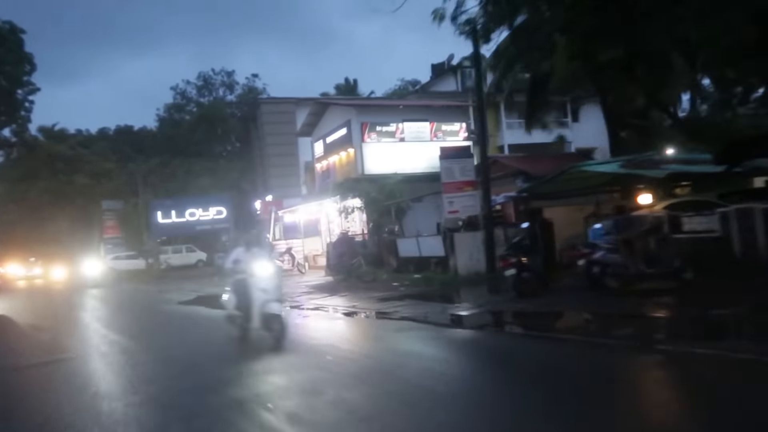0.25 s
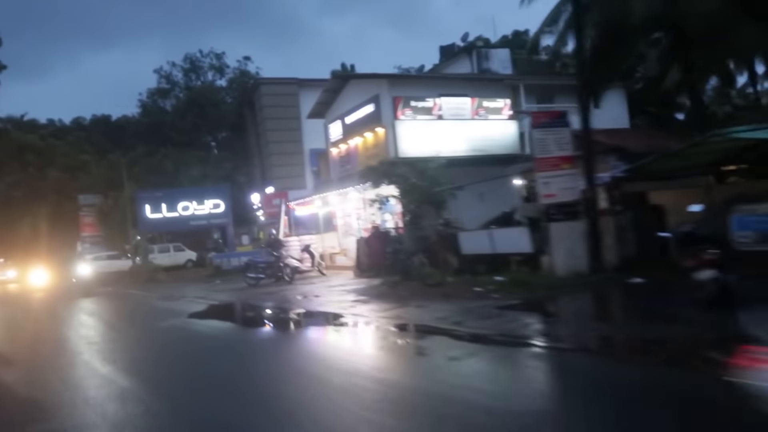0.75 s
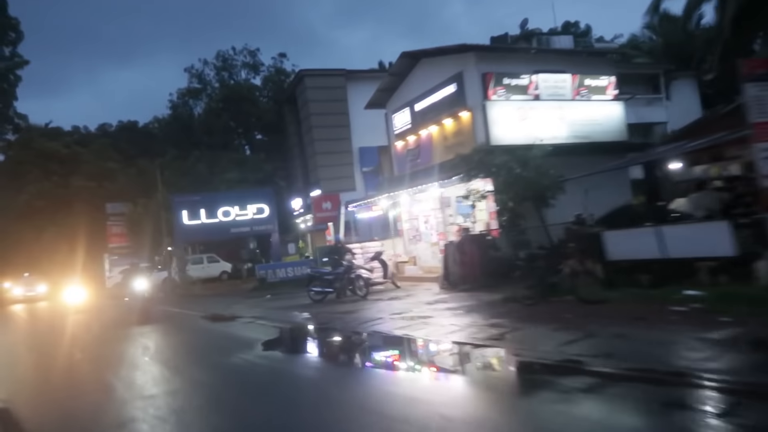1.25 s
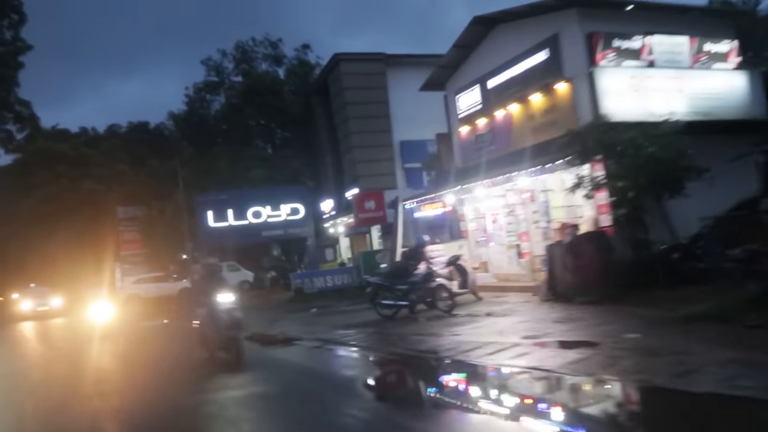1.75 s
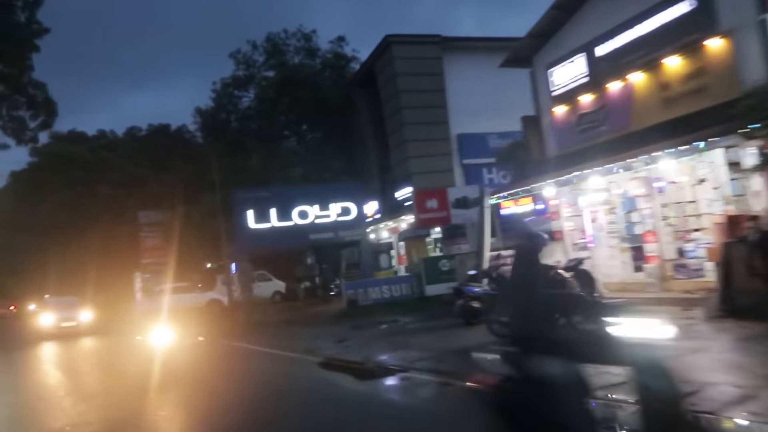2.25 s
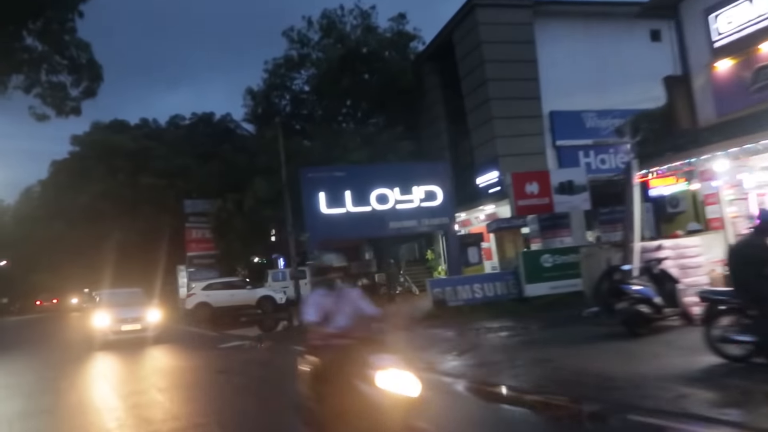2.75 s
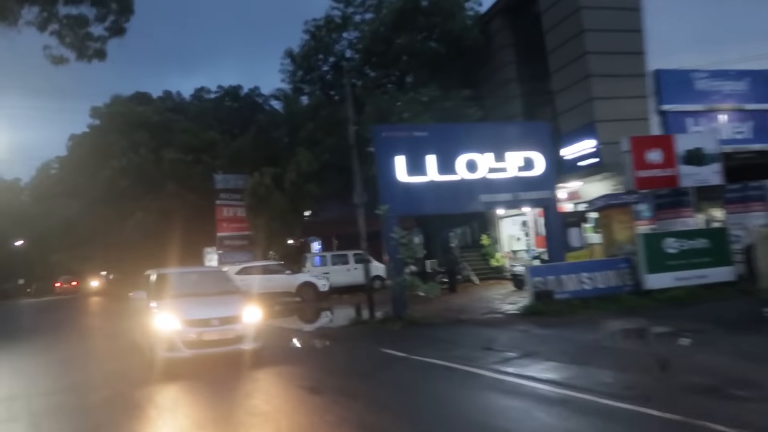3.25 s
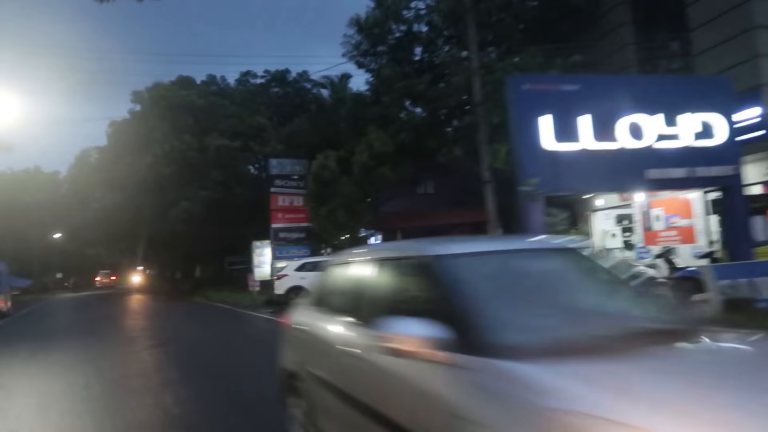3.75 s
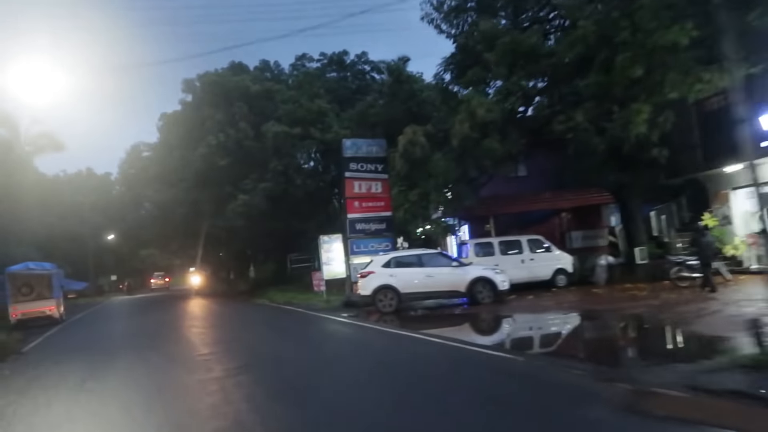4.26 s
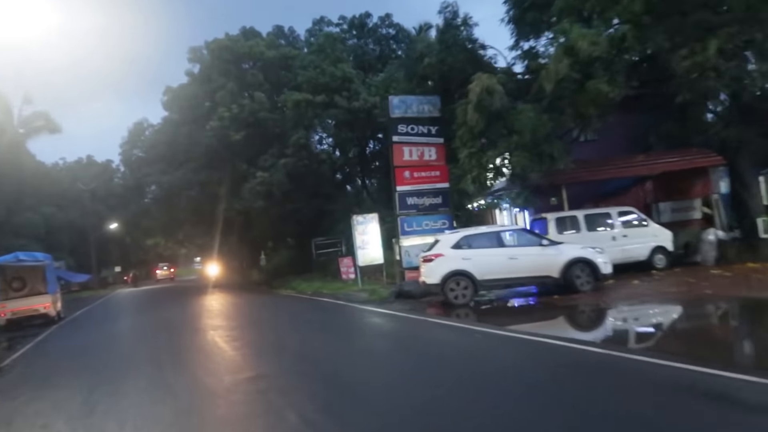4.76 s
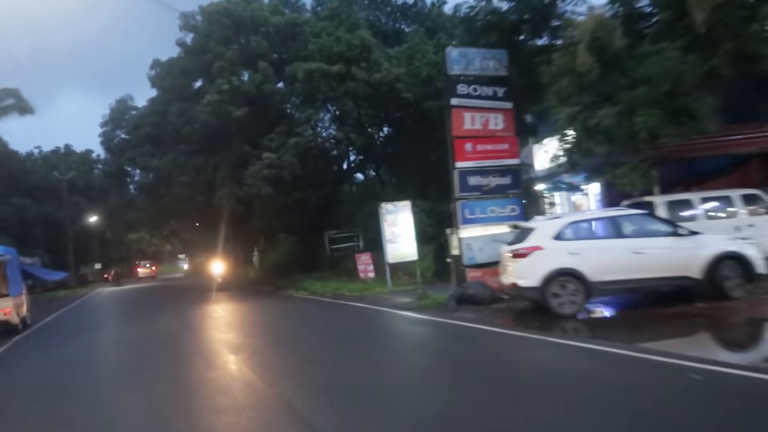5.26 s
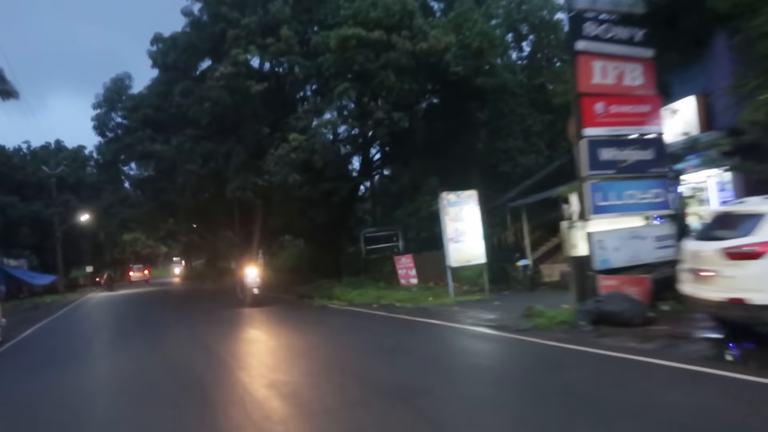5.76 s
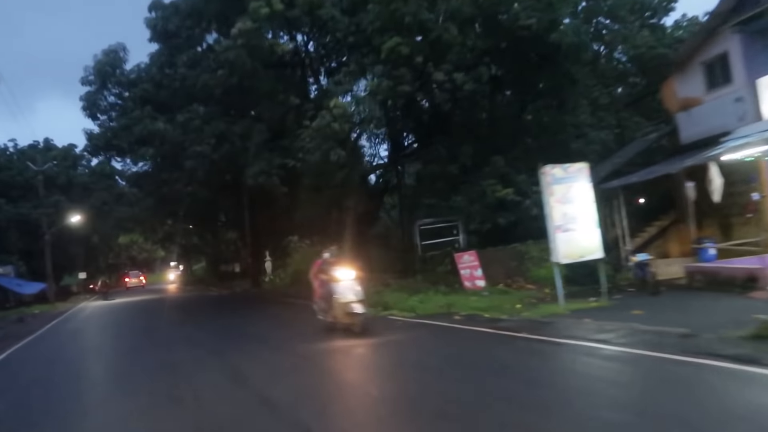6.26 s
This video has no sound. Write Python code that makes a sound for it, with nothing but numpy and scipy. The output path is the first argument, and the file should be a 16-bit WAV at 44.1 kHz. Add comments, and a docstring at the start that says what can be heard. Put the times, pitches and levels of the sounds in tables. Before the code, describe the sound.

Riding a scooter on a wet road, wind buffeting and tyres hissing, as oncoming vehicles swish past, bodywork knocks and a horn pips briefly.

```python
"""A wet road, heard from the saddle of a moving scooter.
Wind is shaped noise in lumps and gusts; tyre roar and spray are shaped noise with drops and chirps.
The engine hum is a stack of tones over exhaust puffs; a gear whine sinks and climbs again.
Oncoming two-wheelers and a car swish past as swelling hiss and drones that drop in pitch.
Bumps knock the plastic bodywork, and a horn of a few high tones and a rattle pips briefly, twice."""
import sys
import numpy as np
from scipy import signal
from scipy.fft import rfft, irfft, next_fast_len
from scipy.io import wavfile
from scipy.ndimage import uniform_filter1d

SR = 44100
rng = np.random.default_rng(int(sys.argv[2]) if len(sys.argv) > 2 else 0)


def put_to_file(sound):
    """Save the sound as 16-bit audio at rate SR, in the file named by the first command-line argument."""
    columns = np.atleast_2d(sound).T  # one column per channel
    safe = np.clip(columns, -1, 1)
    whole_steps = np.round(safe * 32767)
    wavfile.write(sys.argv[1], SR, whole_steps.astype(np.int16))


N = 287091
TIME = np.arange(N) / SR  # seconds
OPPOSITE = np.array([[1], [-1]])  # the two microphones hear the sound upside down from each other

# The scooter's own engine. Each row: time in seconds, crank turns per second, throttle from 0 to 1.
ENGINE = [(0, 76.4, 0.9), (.5, 73.53, 0.2), (1.05, 70.75, 0.07), (2, 68.03, 0.28), (2.8, 63.98, 0.78),
          (4.1, 68.43, 0.81), (4.5, 70.46, 0.93), (5, 76.2, 0.68), (5.6, 77.27, 0.93), (6.1, 78, 1),
          (6.5, 78.3, 0.92)]
# Tone colour of tyre roar and exhaust. Each row: pitch in Hz, relative level in dB.
ROAR = [(200, -14.5), (500, -11), (720, -0.5), (820, -2.5), (960, 0.5), (1100, -1.5), (1210, -0.5),
        (1310, -4), (1430, -2), (1650, -13.5), (2200, -17.5), (4000, -34.5), (9000, -85)]


def gain_of(db):
    """Turns decibels into a factor on the sound wave."""
    return 10 ** (np.asarray(db) / 20)


def evened(x):
    """Scales a sound to an average strength (rms) of 1."""
    return x / np.sqrt(np.mean(x ** 2) + 1e-20)


def curves(rows):
    """Joins the rows of a timed table with straight lines, one curve for each column after the time."""
    s, *columns = np.transpose(rows)
    return [np.interp(TIME, s, column) for column in columns]


def bell(s, half):
    """A smooth hump of height 1 at time s."""
    return np.exp(-((TIME - s) / half) ** 2 / 2)


def colour(x, spectrum):
    """Filters a sound so that each pitch gets the level in the spectrum, then sets rms 1."""
    hz, db = np.transpose(spectrum)
    size = next_fast_len(N)
    bin_hz = np.fft.rfftfreq(size, 1 / SR)
    shape_db = np.interp(np.log(bin_hz + 1), np.log(hz), db)
    return evened(irfft(rfft(x, size) * gain_of(shape_db), size)[:N])


def drift(rate_hz):
    """A smooth random wander round 0, of rms 1, that mostly moves slower than the given rate."""
    points, points_per_s = 8192, 1000
    hz = np.fft.rfftfreq(points, 1 / points_per_s)
    slow = irfft(rfft(rng.standard_normal(points)) / (1 + (hz / rate_hz) ** 4))
    return np.interp(TIME, np.arange(points) / points_per_s, evened(slow))


def turbulence(patchy_db):
    """White noise whose strength wanders in patches of time and pitch."""
    frames, bins = N // 256 + 5, 513
    a, b, patches = rng.standard_normal((3, frames, bins))
    patches = uniform_filter1d(patches, size=9, axis=0)  # smooth in time
    patches = evened(uniform_filter1d(patches, size=14, axis=1))  # smooth in pitch
    z = (a + 1j * b) * gain_of(patchy_db * patches)
    return evened(signal.istft(z.T, nperseg=1024, noverlap=768)[1][:N])


def resonate(x, hz, width):
    """Lets a sound ring at one pitch, the longer the narrower the width in Hz, at rms 1."""
    pole = np.exp((2j * np.pi * hz - np.pi * width) / SR)
    return evened(signal.lfilter([1], [1, -pole], x).real)


def droplets(per_s, spread_db):
    """Water drops as sparse clicks, a few of them large."""
    size = gain_of(spread_db * np.minimum(rng.exponential(1, N), 4))
    falls = rng.random(N) < per_s / SR
    return evened(size * rng.choice([-1, 1], N) * falls)


def wind():
    """Air tumbles in lumps on the microphones and rushes round the rider; at times a low air noise spreads."""
    # Strength of the headwind. Each row: time in seconds, level in dB.
    headwind = [(0, 1), (.7, -3), (1.35, -3.5), (2.1, -2), (3.5, 0.5), (4.9, -0.05), (5.8, 2.5), (6.17, -5),
                (6.5, 5)]
    # Gusts and lulls. Each row: time in s, half length in s, lift of the buffet in dB, lift of the rush in dB.
    gusts = [(0.055, 0.098, 3, -4), (0.46, 0.042, 1, 0.5), (1.354, 0.026, -10, 5), (1.546, 0.031, 6.5, 4.5),
             (1.7, 0.12, 7.5, -1.5), (2.924, 0.036, 0, -1.5), (3.485, 0.046, 6.5, 3), (3.703, 0.059, -5, 2),
             (3.864, 0.028, 8.5, 2), (4.274, 0.014, 5, 3.5), (4.437, 0.087, 8, -0.5),
             (4.554, 0.029, 6, 3.5), (4.874, 0.044, 3, 3), (5.058, 0.017, 4, 7), (5.307, 0.044, 0, -7.5),
             (5.434, 0.047, -18, 2), (5.621, 0.052, 0.5, -0.5), (5.909, 0.044, 8, 0.5),
             (6.431, 0.099, -6, -0.5)]
    # Stretches when low air noise spreads wide, in opposite phase at the two microphones.
    # Each row: start in seconds, end in seconds, fade in seconds, level in dB.
    wide_stretches = [(2.0, 2.15, 0.31, -37.5), (3.506, 5.855, 0.045, -37)]
    # Tone colours of the three kinds of air noise. Each row: pitch in Hz, relative level in dB.
    buffet_spectrum = [(15, -38), (25, -18.5), (50, -10.5), (70, -1), (88, -5), (110, -2.5), (170, -2),
                       (260, -1.5), (500, -33), (1500, -87)]
    rush_spectrum = [(40, -38), (120, -5), (200, -3), (300, 3.5), (355, 1), (440, 0.5), (520, -1),
                     (620, -3.5), (850, -17.5), (1500, -26), (4000, -85)]
    wide_spectrum = [(110, -48), (200, -23), (300, -0.5), (500, 1.5), (700, -2), (1200, -2.5), (1700, -6),
                     (3000, -12), (8000, -45)]

    headwind_db, = curves(headwind)
    buffet_db = -28 + 1.68 * headwind_db  # the buffet grows 1.68 dB for each dB of headwind
    rush_db = -20 + headwind_db
    for s, half, buffet_lift_db, rush_lift_db in gusts:
        buffet_db = buffet_db + buffet_lift_db * bell(s, half)
        rush_db = rush_db + rush_lift_db * bell(s, half)

    wide_level = gain_of(-67)  # always there, very faint
    for start, end, fade, db in wide_stretches:
        outside_s = abs(TIME - np.clip(TIME, start, end))
        wide_level = wide_level + gain_of(db) * np.exp(-outside_s / fade)

    buffet = evened(colour(rng.standard_normal(N), buffet_spectrum) * gain_of(drift(rate_hz=99)))
    rush = evened(colour(rng.standard_normal(N), rush_spectrum) * gain_of(1.88 * drift(rate_hz=43)))
    wide = evened(colour(turbulence(patchy_db=7.0), wide_spectrum) * gain_of(2 * drift(rate_hz=15)))
    return buffet * gain_of(buffet_db) + rush * gain_of(rush_db) + OPPOSITE * wide * wide_level


def thumps():
    """The biggest eddies push on the microphones as a deep, short rumble."""
    # Deep gusts. Each row: time in seconds, half length in seconds, level in dB.
    deep_gusts = [(1.6, 0.056, -33), (3.382, 0.084, -31), (5.65, 0.1, -29), (5.92, 0.08, -21.5),
                  (6.103, .04, -30), (6.37, 0.095, -32.5)]
    rumble = resonate(resonate(rng.standard_normal(N), hz=69, width=41), hz=69, width=41)
    return rumble * sum(gain_of(db) * bell(s, half) for s, half, db in deep_gusts)


def horns():
    """A disc horn sounds as a few high, rasping, fluttering overtones, the disc's rattle and a faint echo."""
    # Pips. Each row: start in s, length in s, base pitch in Hz, relative level in dB, right microphone's gain.
    pips = [(.0, .26, 309, -43.5, .2), (4.05, .205, 377.4, -34.3, 1.25)]
    # Overtones. Each row: multiple of the base pitch, relative level in dB, delay in s, rasp in dB.
    partials = [(8, -7.5, 0, 3.5), (9, 0, 0, 1.8), (10, -9, .142, 3)]
    # Tone colour of the rattling disc. Each row: pitch in Hz, relative level in dB.
    rattle_spectrum = [(2000, -40), (2950, -2), (3150, -6), (3400, 0), (3900, -3), (4300, -22), (6000, -50)]
    attack_s, release_s, echo_s, echo_db, rattle_db = .115, .028, .1, -16, -7

    out, age = np.zeros((2, N)), TIME[:SR]
    for s, length, hz, db, right in pips:
        fading = np.maximum(age - length, 0)
        fall = np.exp(-fading / release_s) + gain_of(echo_db) * np.exp(-fading / echo_s)
        swell = np.minimum(age / attack_s, 1) ** 2 * fall
        flutter = 1 - .55 * np.cos(2 * np.pi * 18 * (age - .036))  # 18 times a second
        turns = np.cumsum(hz * (1 + .003 * drift(rate_hz=80)[:SR])) / SR
        buzz = 0
        for k, partial_db, delay, rasp_db in partials:
            onset = np.clip((age - delay) / .008, 0, 1)
            rasp = gain_of(partial_db + rasp_db * drift(rate_hz=140)[:SR])
            buzz = buzz + onset * rasp * np.sin(2 * np.pi * k * turns)
        rattle = gain_of(rattle_db) * colour(rng.standard_normal(N), rattle_spectrum)[:SR]
        pip = gain_of(db) * (np.sqrt(2) * swell * flutter * buzz + np.sqrt(swell) * rattle)
        out[:, round(s * SR):][:, :SR] += np.array([[1], [right]]) * pip
    return out


def nearness(s, half):
    """Loudness factor of something that goes by at time s: 1 when nearest."""
    return 1 / (1 + ((TIME - s) / half) ** 2) ** .8


def traffic():
    """Adds up the power of the oncoming vehicles' roar, splash and mist, and of the wakes that follow."""
    # Oncoming vehicles. Each row: nearest time in s, half length in s, tyre roar in dB, coarse splash in dB,
    # fine mist in dB, lag of the wake in s, wake in dB.
    passes = [(0.112, 0.19, -27.5, -34, -46, 0.091, -39), (0.812, 0.19, -28, -34.5, -43, 0.27, -35),
              (2.434, 0.17, -24.5, -34, -41, 0.29, -32.5), (3.1, 0.25, -23.5, -28, -40.5, 0.098, -29.5),
              (3.785, 0.07, -33, -35.5, -47, 0.29, -30)]
    roar = splash = mist = wake = 0
    for s, half, roar_db, splash_db, mist_db, lag, wake_db in passes:
        near = nearness(s, half)
        # the roar peaks 0.23 of the way from the spray to the wake
        roar = roar + (nearness(s + lag * .23, half) * gain_of(roar_db)) ** 2
        splash = splash + (near * gain_of(splash_db)) ** 2
        mist = mist + (near * gain_of(mist_db)) ** 2
        wake = wake + (nearness(s + lag, half * .99) * gain_of(wake_db)) ** 2
    return roar, splash, mist, wake


def oncoming():
    """Each passing machine drones louder as it nears, and its pitch drops as it goes by (Doppler)."""
    # Drones. Each row: nearest time in s, pitch in Hz, pitch drop to each side as a share, half length in s,
    # level in dB, overtone in dB relative to the drone, roughness of the pitch as a share.
    drones = [(.85, 428, .02, .2, -29, -14, .009), (.92, 1002, .025, .2, -28.5, -22, .008),
              (2.53, 308, .03, .18, -19.3, -11, .009), (2.5, 740, .03, .16, -28, -15, .03),
              (2.52, 930, .02, .16, -30, -20, .012), (2.53, 1160, .02, .16, -29, -20, .02),
              (2.88, 720, .005, .12, -24.5, -20, .012), (3.3, 714, .008, .3, -23.5, -20, .02),
              (3.15, 1045, .015, .12, -27.5, -20, .007), (3.24, 1240, .025, .24, -24, -22, .015),
              (3.55, 1570, .02, .3, -37, -20, .009)]
    out = np.zeros(N)
    for s, hz, drop, half, db, overtone_db, rough in drones:
        along = (TIME - s) / half
        distance = np.hypot(1, along)  # 1 when nearest
        pitch_hz = hz * (1 - drop * along / distance + rough * drift(rate_hz=41.6))
        angle = 2 * np.pi * np.cumsum(pitch_hz) / SR
        level = gain_of(db + 3.6 * drift(rate_hz=66)) / distance ** 3
        out += level * (np.sin(angle) + gain_of(overtone_db) * np.sin(2 * angle))
    return out


def hiss_bands():
    """Short bands of hiss swell, a few of them sliding in pitch, mostly as vehicles pass."""
    # Bands. Each row: time in s, half length in s, centre pitch in Hz, glide in Hz per second,
    # rough width of the band in Hz, level in dB.
    bands = [(0.17, 0.048, 5200, 0, 700, -42), (0.677, 0.099, 2420, -2, 150, -35),
             (0.78, 0.049, 2900, 0, 500, -34), (0.965, .005, 4700, 0, 900, -36),
             (0.965, .006, 7350, 0, 1600, -37), (1.013, 0.065, 4600, 9000, 1200, -41),
             (2.462, 0.047, 7100, -7000, 700, -49), (2.42, 0.15, 3398, 0, 900, -41.5),
             (2.663, 0.053, 5270, 5000, 700, -43), (3.08, 0.03, 7940, -3, 600, -45),
             (3.273, .04, 5070, -2, 1900, -40), (4.08, .025, 3550, 0, 250, -39),
             (4.1, .015, 2650, 7000, 200, -36)]
    size = next_fast_len(N)
    hz, white = np.fft.rfftfreq(size, 1 / SR), rfft(rng.standard_normal(size))
    out = np.zeros(N)
    for s, half, centre_hz, glide, width, db in bands:
        band_shape = 1 / (1 + ((hz - centre_hz) / (0.55 * width)) ** 4)
        band = np.fft.ifft(white * band_shape, size)[:N]  # complex, so that its pitch can be shifted
        hiss = evened((band * np.exp(1j * np.pi * glide * (TIME - s) ** 2)).real)
        out += hiss * gain_of(db) * bell(s, half)
    return out


def squelch():
    """The tread squeezes water out in short, gliding chirps of scattered pitch and size."""
    chirps_per_s, low_hz, high_hz = 300, 1593, 5530
    out = np.zeros(N + SR)
    # six chances from 0 to 1 for each chirp
    for start, pitch, cycles, glide, size, phase in rng.random((round(chirps_per_s * N / SR), 6)):
        hz = low_hz * (high_hz / low_hz) ** pitch
        along = np.linspace(-.5, .5, round(80 * (.5 + cycles) * SR / hz))  # 40 to 120 cycles long
        turns = np.cumsum(hz * (1 + .025 * (2 * glide - 1) * along)) / SR + phase
        size_db = 3.3 * min(-np.log(1 - size), np.e)
        db = size_db - 7.5 * np.log2(hz / low_hz)  # weaker by 7.5 dB per octave
        swell = np.sin(np.pi * np.sqrt(along + .5)) ** 2  # rises fast, falls slowly
        out[int(start * N):][:len(along)] += gain_of(db) * swell * np.sin(2 * np.pi * turns)
    return evened(out[:N])


def spray():
    """Wet tyres hiss and fling drops; side spray reaches the two microphones in opposite phase."""
    # Water on the road under the scooter. Each row: time in seconds, level in dB.
    wetness = [(0, 1), (1.35, 2), (1.8, 0), (3.6, 2.5), (4.4, 0.5), (5.2, -2), (5.8, 1), (6.5, 2.5)]
    # Tone colours of splash, mist and side spray. Each row: pitch in Hz, relative level in dB.
    splash_spectrum = [(700, -26), (1500, 0), (2000, 0.5), (2500, -4), (3300, -6), (4200, -10),
                       (6000, -21.5), (11000, -79.5)]
    mist_spectrum = [(1500, -17), (3300, -12.5), (4500, -0.5), (6000, 3.5), (8000, 0.5), (9500, -2),
                     (10500, -18.5), (11500, -36), (12500, -49)]
    side_spectrum = [(300, -69), (800, -37), (1300, -6), (2200, 1), (4500, 0.5), (6000, 1), (9400, -1),
                     (12000, -9), (14000, -16.5), (15700, -46)]

    wet_db, = curves(wetness)
    _, passing_splash, passing_mist, wake = traffic()
    coarse, fine, stray = (droplets(per_s=900, spread_db=3.5) for _ in range(3))

    splash = colour(turbulence(patchy_db=2) + .3 * coarse, splash_spectrum)
    splash = evened(splash + gain_of(-4) * squelch()) * gain_of(.7 * drift(rate_hz=18))
    mist = colour(turbulence(patchy_db=2.4) + .5 * fine, mist_spectrum) * gain_of(.8 * drift(rate_hz=14))
    beside = colour(turbulence(patchy_db=1.0) + .3 * stray, side_spectrum)

    # power of own spray, passing spray and wakes; own mist grows 1.83 dB for each dB of water
    splash_power = gain_of(-34.5 + wet_db) ** 2 + passing_splash + wake * gain_of(-0.5) ** 2
    mist_power = gain_of(-51 + 1.83 * wet_db) ** 2 + passing_mist + wake * gain_of(-14.5) ** 2
    side_power = gain_of(-40) ** 2 + wake
    ahead = splash * np.sqrt(splash_power) + mist * np.sqrt(mist_power)
    return ahead + OPPOSITE * beside * np.sqrt(side_power)


def knocks():
    """Each bump in the road rings the plastic panels for a moment."""
    # Bumps. Each row: time in seconds, peak level in dB.
    bumps = [(0.676, -6), (0.848, -17), (1.346, -25), (2.2, -15), (2.555, -7.5), (2.828, -7), (3.503, -7),
             (5.302, -11)]
    # Panels. Each row: pitch in Hz before scatter, relative level in dB, seconds to fade by 60 dB.
    panels = [(351, -3, 0.045), (595, -21, 0.022), (723, 4.5, 0.029), (1000, -1.5, 0.014),
              (1350, -19, .015)]
    out, age = np.zeros(N), np.arange(SR // 10) / SR
    attack = 1 - np.exp(-(age / .0005) ** 2)
    for s, peak_db in bumps:
        ring = 0
        for hz, db, t60 in panels:
            scattered_hz = hz * rng.uniform(0.89, 1.06)
            ring = ring + gain_of(db - 60 * age / t60) * np.sin(2 * np.pi * scattered_hz * age)
        ring = attack * ring
        out[round(s * SR):][:len(age)] += gain_of(peak_db) * ring / abs(ring).max()
    return out


def tyres():
    """Tread noise on asphalt, louder under power and as traffic passes, with a hollow ring."""
    # Level of the hollow ring. Each row: time in seconds, level in dB.
    hollow = [(0, -29), (.68, -26), (.9, -31.5), (1.5, -27), (1.75, -45), (2.3, -44), (2.46, -22),
              (2.68, -33), (2.85, -30), (3.3, -22.5), (3.8, -25.5), (4.75, -27.5), (5.3, -32.5),
              (6.5, -26.5)]
    _, throttle = curves(ENGINE)
    own = gain_of(-24.5 + 2.5 * throttle ** 4)
    passing_power = traffic()[0]
    roar = colour(turbulence(patchy_db=1.0), ROAR) * gain_of(0.54 * drift(rate_hz=41))
    ring = resonate(resonate(rng.standard_normal(N), hz=732, width=99), hz=732, width=99)
    return roar * np.sqrt(own ** 2 + passing_power) + ring * gain_of(curves(hollow)[0])


def gears():
    """Meshing gear teeth sing; off the throttle they go slack, waver more and sound harsher."""
    # Main whine, coasting and then pulling. Each row: time in seconds, tooth meshes per second, level in dB.
    whine_course = [(0, 1030, -42), (.85, 950, -41), (1.1, 934, -35), (1.4, 922, -30.5), (1.52, 910, -36),
                    (1.68, 894, -31.5), (1.93, 877, -32), (2.05, 868, -36), (2.22, 854, -29.5),
                    (2.42, 900, -50), (3.7, 1135, -46), (4.05, 1156, -29), (4.3, 1170, -31),
                    (4.6, 1186, -30), (5.2, 1205, -29.5), (5.45, 1210, -31), (5.75, 1225, -26.5),
                    (6.5, 1240, -29)]
    # Other gear pairs, stronger under load. Each row: multiple of the whine's pitch, full-throttle level in dB.
    other_pairs = [(.5, -38), (.613, -35), (.77, -41), (.85, -39), (1.09, -40.5), (1.2, -39.5)]

    mesh_hz, level_db = curves(whine_course)
    _, throttle = curves(ENGINE)
    slack = np.clip(1 - throttle, 0, 1)
    overtone_db = -1 - 18 * throttle  # relative to the whine
    waver = (.002 + .0028 * slack ** 2) * drift(rate_hz=35)  # share of the pitch
    angle = 2 * np.pi * np.cumsum(mesh_hz * (1 + waver)) / SR

    whine = others = 0
    for k, db in [(1, 0), (2, overtone_db)]:
        flutter_db = (1.3 + 2.2 * slack) * drift(rate_hz=16)
        whine = whine + gain_of(level_db + db + flutter_db) * np.sin(k * angle)
    for ratio, db in other_pairs:
        others = others + gain_of(db + 3.5 * drift(rate_hz=9)) * np.sin(ratio * angle)
    return whine + others * gain_of(-12 * slack)


def engine():
    """One cylinder fires every second turn at a slightly uneven speed; the intake drones near full throttle."""
    # Tones of the hum. Each row: multiple of the crank speed, relative level in dB.
    orders = [(1.5, -14), (2, -15.5), (2.5, -8), (3.5, -12.5), (4, 3), (4.5, -9), (5, -2), (6, -0.5)]
    airbox_hz, airbox_width_hz, airbox_db = 545, 16, 9.5

    crank_hz, throttle = curves(ENGINE)
    level_db = -37.5 + 11 * throttle
    intake_db = -46.5 + 9 * throttle ** 4
    turns = np.cumsum(crank_hz * (1 + 0.0075 * drift(rate_hz=20))) / SR

    hum = 0
    for k, db in orders:
        tone = np.sin(2 * np.pi * (k * turns + rng.random()))
        hum = hum + gain_of(db + 4.2 * drift(rate_hz=9.8)) * tone

    since_firing = turns / 2 % 1  # 0 at each firing, 1 at the next
    puffs = colour(rng.standard_normal(N) * np.exp(-since_firing / 0.7), ROAR)  # exhaust chuff

    # the intake sings at 7 times the crank speed, and the airbox rings when that comes near its own pitch
    off_tune = (7 * crank_hz - airbox_hz) / airbox_width_hz
    intake = np.sin(2 * np.pi * 7 * turns) * gain_of(airbox_db / (1 + off_tune ** 2))
    drone = intake * gain_of(intake_db + 2.1 * drift(rate_hz=9.1))
    return gain_of(level_db) * (evened(hum) + gain_of(-6.5) * puffs) + drone


def scene():
    """Machines, tyres and most of the wind sit in the middle; side spray and some low air noise spread wide."""
    air = wind() + thumps()
    others = horns() + oncoming() + hiss_bands()
    scooter = spray() + knocks() + tyres() + gears() + engine()
    return air + others + scooter


def record(dry):
    """Cuts off the treble above 15.5 kHz."""
    low_pass = signal.firwin(511, 15500, window=("kaiser", 9), fs=SR)
    return signal.oaconvolve(dry, low_pass[None], "same")


dry = scene()
out = record(dry)
put_to_file(out)
```